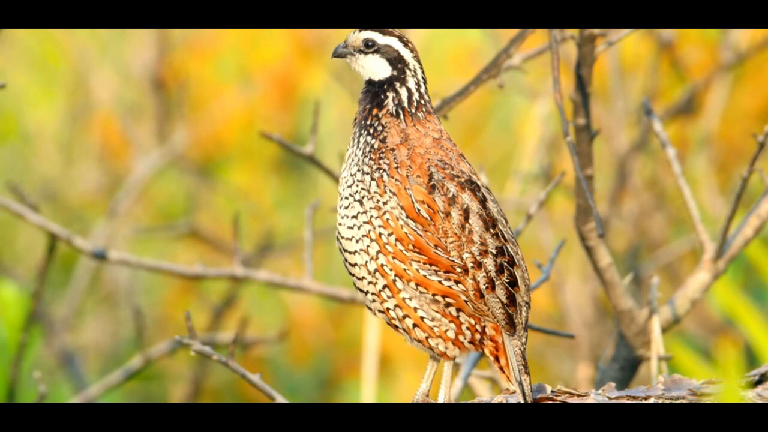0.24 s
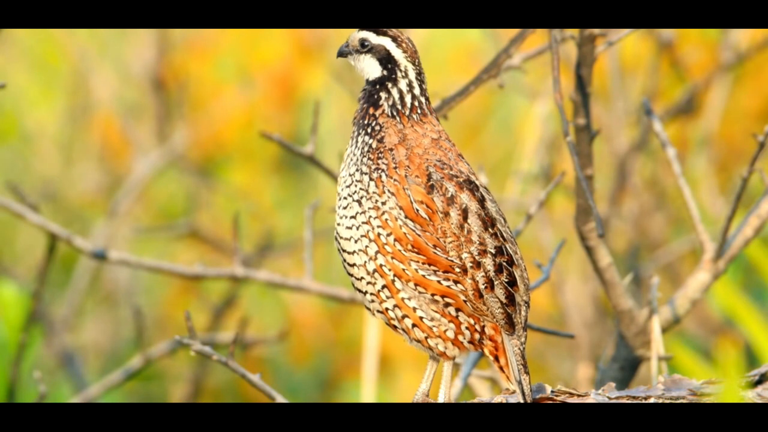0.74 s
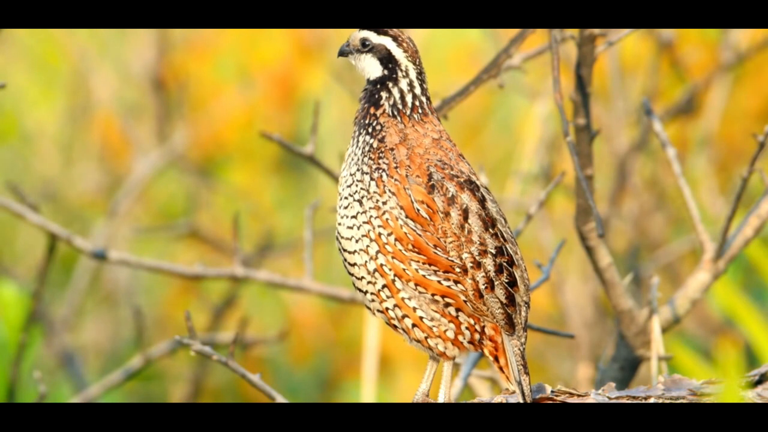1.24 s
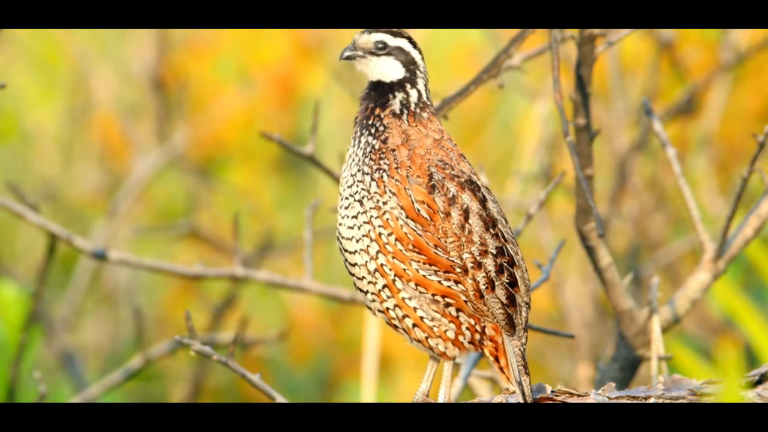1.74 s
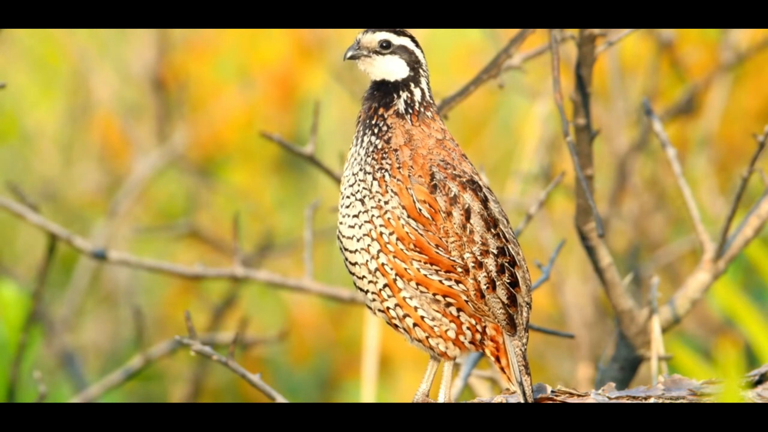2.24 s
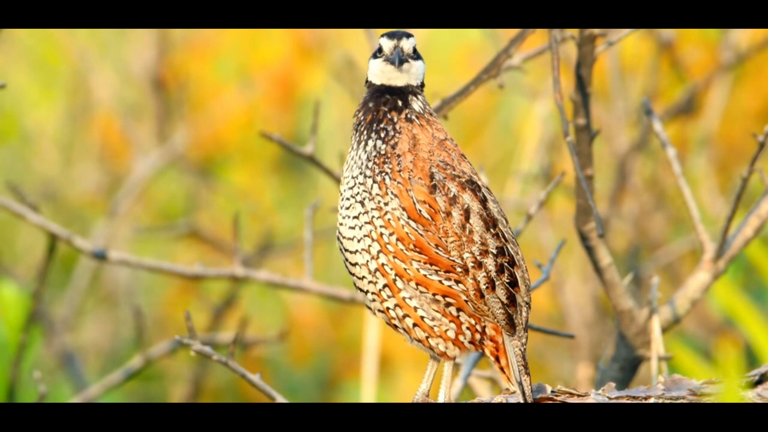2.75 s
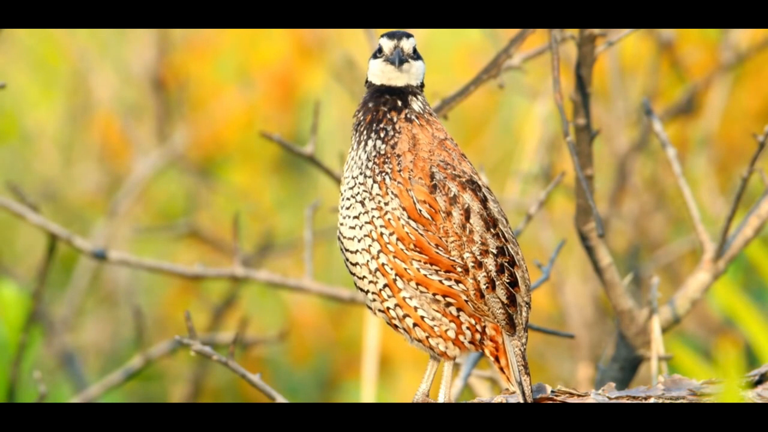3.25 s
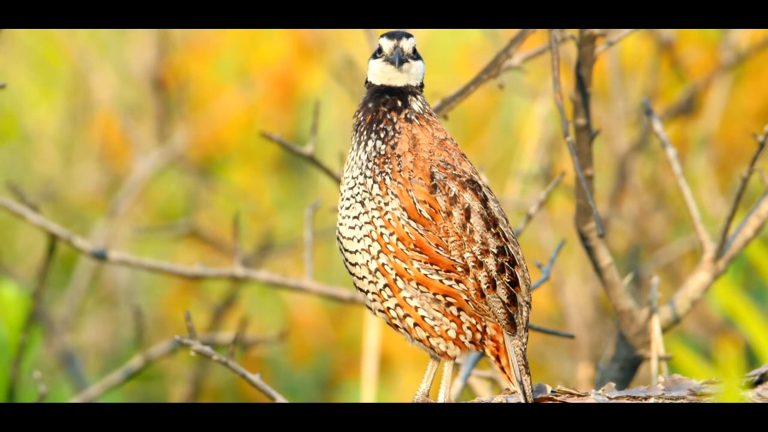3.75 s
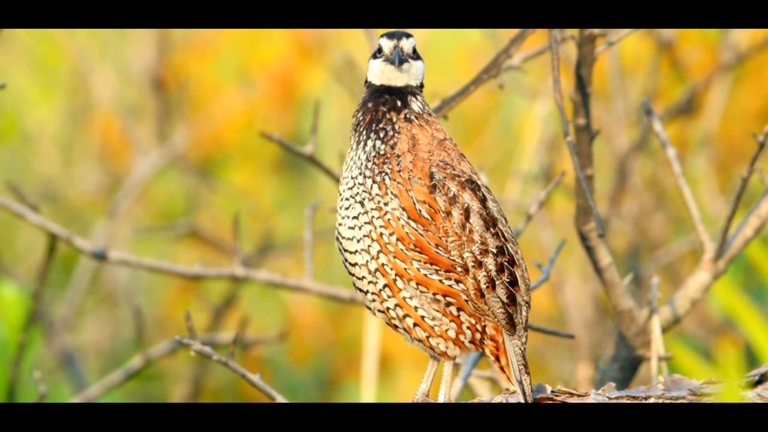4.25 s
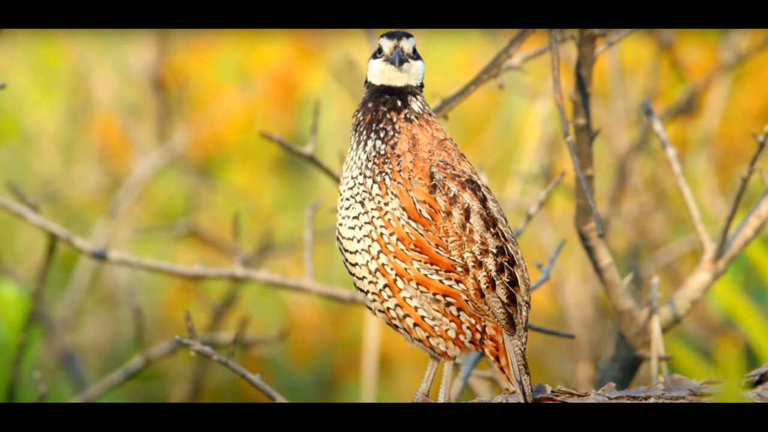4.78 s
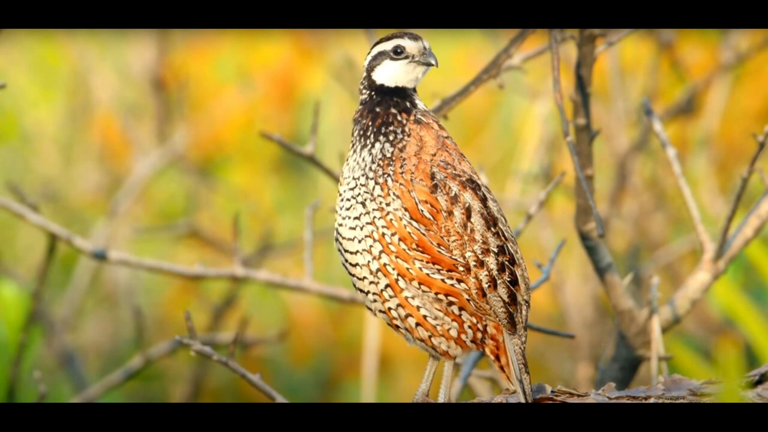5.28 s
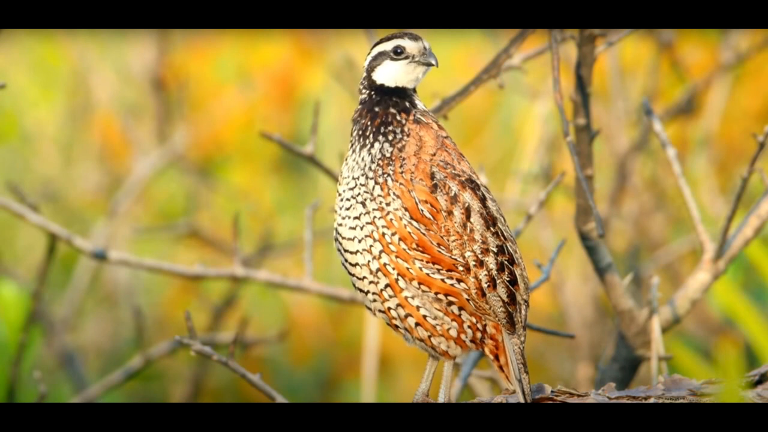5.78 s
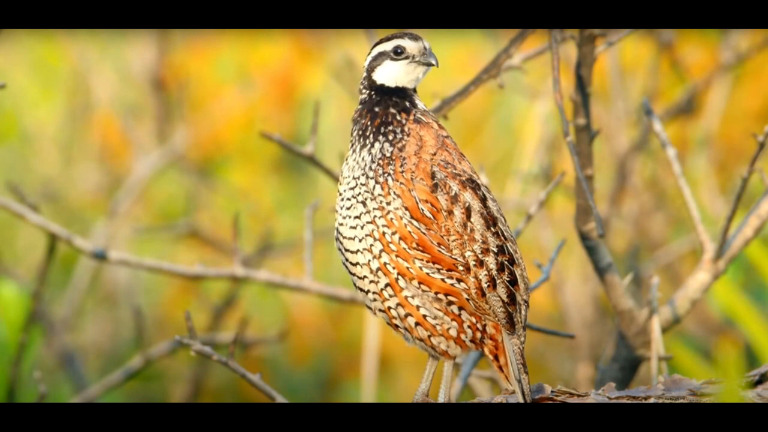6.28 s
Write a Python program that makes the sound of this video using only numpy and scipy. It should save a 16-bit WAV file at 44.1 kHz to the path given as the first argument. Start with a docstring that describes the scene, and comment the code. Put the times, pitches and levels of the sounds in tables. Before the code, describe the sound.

Outdoor scrub with pulsing crickets and small birds chirping and buzzing, while a nearby quail gives sweet, paired, bending whistles.

```python
"""Morning scrubland: close by, one bird whistles slurred pairs of nearly pure notes, made as bent tones.
A finch-like bird buzzes trills of fast sweeps, another repeats a three-part phrase, far birds chirp, chip,
toot and coo, and faint slurs blur behind them. Three crickets pulse steadily with short rests over bands of
farther ones; traffic rumble and hiss are shaped noise, and the bushes return a soft decaying tail."""
import sys
import numpy as np
from scipy import signal
from scipy.fft import rfft, irfft
from scipy.io import wavfile
from scipy.ndimage import uniform_filter1d

SR = 44100
rng = np.random.default_rng(int(sys.argv[2]) if len(sys.argv) > 2 else 0)


def master(y):
    """Save y as 16-bit WAV."""
    cut = np.clip(np.atleast_2d(y).T, -1, 1)
    pcm = np.round(cut * 32767)  # scale
    wavfile.write(sys.argv[1], SR, pcm.astype(np.int16))


N = 287532
T = np.arange(N) / SR


def undb(db):
    """Decibel law: 20 dB is a factor of ten in amplitude."""
    return 10 ** (np.asarray(db) / 20)


def level(x, db):
    """Normalisation: scales a signal to an rms level."""
    return x * undb(db) / np.sqrt(np.mean(x ** 2))


def band(hz, width_hz):
    """Spectral shaping: noise with a bell-shaped spectrum, rms 1."""
    f = np.arange(N // 2 + 1) * SR / N
    bell = np.exp(-((f - hz) / width_hz) ** 2)
    return level(irfft(rfft(rng.standard_normal(N)) * bell, N), 0)


def walk(rate):
    """Slow random modulation: values held 1 / rate s and slewed twice; spread near 1."""
    hold = int(SR / rate)
    steps = np.repeat(rng.standard_normal(N // hold + 1), hold)
    return 1.19 * uniform_filter1d(uniform_filter1d(steps, hold), hold)[:N]


def add(out, start_s, hz, gain, harmonics_db=()):
    """Additive synthesis: a tone with pitch and rms gain per sample, plus overtones from the 2nd up."""
    i = int(round(start_s * SR))
    phase = 2 * np.pi * (np.cumsum(hz) / SR + rng.random())
    tone = np.sin(phase) + sum(undb(db) * np.sin((k + 2) * phase) for k, db in enumerate(harmonics_db))
    tone = (np.sqrt(2) * gain * tone)[max(-i, 0):max(N - i, 0)]
    out[max(i, 0):max(i, 0) + len(tone)] += tone


def add_slur(out, start_s, length_s, hz3, db, sharp=1, harmonics_db=()):
    """Frequency glide: a short note bent through three pitches under a rounded swell."""
    u = np.arange(int(length_s * SR)) / (length_s * SR)
    first, middle, last = hz3
    # the parabola through the three pitches
    hz = first + (4 * middle - 3 * first - last) * u + 2 * (first + last - 2 * middle) * u ** 2
    add(out, start_s, hz, undb(db) * np.sin(np.pi * u) ** sharp, harmonics_db)


def sung(notes, edge_s, waver_hz, rate, overtone_db, break_hz=1):
    """Frequency modulation: notes follow pitch and level curves, with soft ends and unsteady pitch."""
    out, waver = np.zeros(N), waver_hz * walk(rate)
    for s, hz, db in (np.transpose(note) for note in notes):
        t = T[(T >= s[0] - edge_s) & (T < s[-1] + edge_s)]
        ends = np.clip(np.minimum(t - t[0], t[-1] - t) / edge_s, 0, 1)
        pitch = uniform_filter1d(np.interp(t, s, hz), size=130) + np.interp(t, T, waver)
        # where the voice breaks downward its octave falls into the throat resonance and rings out
        octave_db = np.where(pitch < break_hz, 0, overtone_db)
        add(out, t[0], pitch, ends * undb(np.interp(t, s, db)), [octave_db])
    return out


# falling notes: start_s, first_hz, bend_after_s, bend_hz, break_after_s, hz_before_break,
# level_at_bend_db, level_at_break_db
WHISTLE_FALLS = [(1.54, 3390, 0.056, 2800, 0.086, 2820, -29.5, -31),
                 (2.208, 3410, 0.039, 3190, 0.075, 3060, -31, -29),
                 (2.945, 3200, 0.0295, 3120, 0.079, 2860, -31, -27),
                 (3.581, 3390, 0.041, 3106, 0.082, 2870, -29.5, -29)]
# drop where the voice breaks: after_break_s, pitch_hz, level_re_break_db
VOICE_BREAK = [(.01, 2590, -3), (.014, 2340, -10), (.02, 1500, -18)]


def falling_notes():
    """Register break: the pitch bends down, then drops abruptly and fades."""
    notes = []
    onset_s, start_db, onset_db = .013, -12, -3.5  # levels relative to the bend
    for s, first, bend, bend_hz, knee, knee_hz, db, knee_db in WHISTLE_FALLS:
        note = [(s, first, db + start_db),
                (s + onset_s, first + (bend_hz - first) * onset_s / bend, db + onset_db),
                (s + bend, bend_hz, db),
                (s + knee, knee_hz, knee_db)]
        note += [(s + knee + after, hz, knee_db + less_db) for after, hz, less_db in VOICE_BREAK]
        notes.append(note)
    return notes


# dipping notes: start_s, shoulder_pause_s, jump_after_pause_hz, bottom_after_s, bottom_hz,
# back_at_shoulder_after_s, crest_before_top_hz, top_after_s, top_hz, closing_drop_hz, level_down_db, level_up_db
WHISTLE_DIPS = [(1.729, 0.0048, 3, 0.069, 2268, 0.11, 2720, .13, 2806, 420, -30, -28.5),
                (2.394, .018, 15, .084, 2180, .13, 2760, .147, 2980, 400, -32, -30.5),
                (3.134, 0.011, 200, .082, 2124, .133, 2720, 0.14, 2860, 250, -32, -29.5),
                (3.77, 0.0042, 0, 0.075, 2177, .114, 2700, 0.16, 2733, 100, -29.5, -27)]


def dipping_notes():
    """Continuous glide: down by way of a shoulder, loudest near its pitch and faint at the bottom, and up."""
    notes = []
    first_hz, shoulder_hz, drop_s = 3190, 2558, .031
    onset_s, onset_db, high_db = .008, -9, -2.5
    jump_s, jump_db_per_hz = .004, -.0355
    round_s, round_hz, low_db = .01353, 51, -9  # rounding of the bottom
    crest_share = .59  # where the rise bends between shoulder and top
    top_db, tail_s, tail_db = -8, .0145, -19
    for s, pause, jump_hz, low, low_hz, back, crest_hz, top, top_hz, drop_hz, db, up_db in WHISTLE_DIPS:
        go = s + drop_s + pause
        notes.append([(s, first_hz, db + onset_db),
                      (s + onset_s, first_hz, db + high_db),
                      (s + drop_s, shoulder_hz, db),
                      (go - jump_s, shoulder_hz, db),
                      (go, shoulder_hz + jump_hz, db + jump_db_per_hz * jump_hz),
                      (go + 2 * jump_s, shoulder_hz - 100, db),
                      (s + low - round_s, low_hz + round_hz, db + low_db / 2),
                      (s + low, low_hz, db + low_db),
                      (s + low + round_s, low_hz + round_hz, up_db + low_db),
                      (s + back, shoulder_hz, up_db),
                      (s + back + crest_share * (top - back), crest_hz, up_db - 1.0),
                      (s + top, top_hz, up_db + top_db),
                      (s + top + tail_s, top_hz - drop_hz, up_db + tail_db)])
    return notes


# quick downward flicks: start_s, drop_s, linger_s, first_hz, last_hz, level_db
WHISTLE_FLICKS = [(4.413, 0.019, 0.0073, 3550, 2890, -28), (4.533, 0.029, .004, 3400, 2840, -29.5),
                  (5.172, 0.0183, 0.018, 3650, 3040, -32), (5.307, 0.031, 0.011, 3450, 2870, -32.5),
                  (5.951, 0.028, 0.018, 3730, 2835, -25.5), (6.089, 0.024, 0.0033, 3450, 2820, -31.5)]
# course of a flick: share_of_drop, share_of_span, relative_level_db
FLICK_COURSE = [(0, 1, -13), (.25, 0.826, -6.5), (.5, 0.44, 0), (.75, .15, -2), (1, 0.028, -7)]


def flicked_notes():
    """Rapid downward sweep: the pitch levels out as it nears its last value."""
    notes = []
    for s, drop, linger, first, last, db in WHISTLE_FLICKS:
        note = [(s + u * drop, last + share * (first - last), db + less_db) for u, share, less_db in FLICK_COURSE]
        notes.append(note + [(s + drop + linger, last, db - 12)])
    return notes


# held notes: start_s, length_s, first_hz, settled_hz, step_after_s, hz_before_step, hz_after_step, last_hz,
# level_settled_db, level_at_step_db, level_at_end_db
WHISTLE_HOLDS = [(4.473, 0.051, 2830, 2710, .026, 2690, 2640, 2660, -33.5, -35, -38),
                 (4.593, 0.25, 2776, 2633, .1, 2596, 2534, 2414, -33, -32, -38.5),
                 (5.222, 0.069, 2690, 2680, .028, 2670, 2510, 2560, -32, -29.5, -35.5),
                 (5.362, 0.22, 2777, 2640, .115, 2578, 2490, 2402, -32.5, -29.5, -39.5),
                 (6.021, 0.06, 2620, 2560, .028, 2570, 2520, 2550, -27.5, -29.5, -37),
                 (6.143, 0.19, 2690, 2624, 0.056, 2600, 2500, 2264, -27.5, -30, -41.5)]


def held_notes():
    """Sustained tone: the pitch settles, steps down once and drifts to its last value."""
    notes = []
    attack_s, settle_s, release_s = .011, .0243, .0075
    edge_db, first_db, step_share = -12, -2, .1  # step_share is of the length
    for s, length, first, settled, step, upper, lower, last, db, step_db, end_db in WHISTLE_HOLDS:
        notes.append([(s, first, db + edge_db),
                      (s + attack_s, first, db + first_db),
                      (s + settle_s, settled, db),
                      (s + step, upper, step_db),
                      (s + step + step_share * length + .006, lower, step_db),
                      (s + length - release_s, last, end_db),
                      (s + length, last, end_db + edge_db)])
    return notes


def whistler():
    """Nearly sinusoidal whistle: a faint octave, as strong as the fundamental only below the voice break."""
    notes = falling_notes() + dipping_notes() + flicked_notes() + held_notes()
    return sung(notes, edge_s=.003, waver_hz=14, rate=60, overtone_db=-38, break_hz=2000)


# trills: first_pulse_s, last_pulse_s, pulses_per_s, slowing_per_s2, centre_hz, first_span_hz, last_span_hz,
# share_scattered_by_bushes_db, swell_s, level_at_start_db, level_after_swell_db, level_at_end_db
BUZZ_TRILLS = [(0.636, 1.397, 86, 17, 5940, 600, 1730, -16, .25, -56, -39.5, -41.5),
               (2.16, 2.695, 87, 24, 6100, 700, 1300, -3.5, .3, -56, -55, -55),
               (2.9335, 3.34, 103, 10.7, 5430, 340, 1160, -8.5, 0.26, -48.5, -33, -32),
               (3.7267, 4.626, 87, 15, 5920, 600, 1710, -19, 0.32, -71, -39.5, -41),
               (4.8525, 5.38, 93, 24, 6130, 640, 1250, -1.5, 0.34, -56, -54.5, -56)]


def trills():
    """Pulse train: falling sweeps, quick and faint at first, slow down and widen as the breath goes."""
    direct, scattered = np.zeros(N), np.zeros(N)
    for first, last, rate, slowing, hz, span0_hz, span1_hz, wet_db, swell, db0, db1, db2 in BUZZ_TRILLS:
        run = np.zeros(N)
        length = last - first
        k = np.arange(int(rate * length - slowing * length ** 2 / 2 + .5) + 1)
        # times at which the falling pulse rate has counted k pulses
        for s in first + (rate - np.sqrt(rate ** 2 - 2 * slowing * k)) / slowing:
            # full width is reached about half way through
            span = span0_hz + (span1_hz - span0_hz) * min(1, 1.94 * (s - first) / length)
            chance = rng.standard_normal(2)
            db = np.interp(s, (first + swell, last), (db1, db2)) + 1.1 * chance[0]
            db += (db0 - db1) * max(0, 1 - (s - first) / swell) ** 2
            sweep_hz = (hz + span * (.81 + .13 * chance[1]), hz, hz - .37 * span)
            add_slur(run, s - .0035, .0077, sweep_hz, db, sharp=1.67)
        direct, scattered = direct + run, scattered + undb(wet_db) * run
    # the ground returns each sweep 4.6 ms later, near half a pulse period
    return direct + undb(-14.5) * np.roll(direct, int(.0046 * SR)) + bushes(scattered)


# crickets: first_pulse_s, pulses_per_s, pulse_length_s, first_hz, last_hz, mean_level_db,
# second_harmonic_db, third_harmonic_db, level_scatter_db
CRICKET_PULSES = [(.003, 39.345, .015, 4350, 4080, -39.5, -25, -32, 0.76),
                  (0.000998, 40.93, .013, 4700, 4520, -46, -21, -30, 1.6),
                  (.0135, 53.4, 0.015, 5420, 5260, -54, -50, -51, 1.5)]
# rests, one list per cricket: from_s, to_s
CRICKET_RESTS = [
    [(1.0, 1.065), (3.77, 3.855), (5.71, 5.79)],
    [(.06, .12), (.3, .36), (.5, .57), (2.78, 2.86), (3.39, 3.45), (5.57, 5.64)],
    [(.39, .455), (1.91, 1.985), (2.31, 2.39), (3.62, 3.68), (4.84, 4.92), (5.23, 5.3)],
]


def crickets():
    """Stridulation: each wing stroke is a pulse that sags in pitch; strokes are regular, with short rests."""
    out = np.zeros(N)
    for pulses, rests in zip(CRICKET_PULSES, CRICKET_RESTS):
        first, rate, length, hz0, hz1, db, second_db, third_db, scatter_db = pulses
        for s in np.arange(first, N / SR, 1 / rate):
            chance = rng.standard_normal(2)
            if not any(a < s < b for a, b in rests):
                add_slur(out, s - length / 2 + .0004 * chance[0], length, (hz0, (hz0 + hz1) / 2, hz1),
                         db + scatter_db * chance[1], sharp=.68, harmonics_db=(second_db, third_db))
    return out


# repeated phrase: start_s, low_note_level_db
PHRASE_STARTS = [(3.401, -38), (3.556, -35), (3.705, -37), (3.853, -38), (4.003, -35.5), (4.153, -36.5),
                 (4.303, -37.5), (4.454, -40.5), (4.611, -37), (4.77, -40.5)]
# low note, slide and high note: after_start_s, length_s, first_hz, middle_hz, last_hz
PHRASE_NOTES = [(0, .024, 3600, 3550, 3440), (.026, .021, 3900, 4800, 5300), (.101, .024, 5650, 6190, 6230)]


def phrase_bird():
    """Discrete reflection: low note, rising slide, high note; a bank behind the bird returns one echo."""
    out = np.zeros(N)
    for k, (s, low_db) in enumerate(PHRASE_STARTS):
        parts_db = (low_db, -33.5, -39.5 - .37 * k)  # the high note weakens with each repeat
        # the last repeat stops before its high note
        parts = PHRASE_NOTES[:-1] if k == len(PHRASE_STARTS) - 1 else PHRASE_NOTES
        for (after, length, *hz3), db in zip(parts, parts_db):
            add_slur(out, s + after, length, hz3, db, sharp=.61)
    return out + undb(-14.5) * np.roll(out, int(.052 * SR))


# single chirps: start_s, length_s, first_hz, middle_hz, last_hz, top_level_db
SINGLE_CHIRPS = [(0.105, .076, 2730, 3400, 4000, -49), (0.347, .029, 3000, 3060, 3200, -49),
                 (1.49, 0.039, 2450, 2870, 3200, -41.5), (3.763, .026, 2605, 2750, 2670, -42),
                 (4.059, 0.029, 2800, 2930, 2730, -41), (4.354, 0.032, 2760, 2850, 2890, -42),
                 (4.926, 0.019, 2820, 2690, 2605, -39.5), (4.966, 0.062, 2796, 2675, 2630, -44.5),
                 (5.53, 0.047, 3000, 3130, 3200, -47), (5.732, 0.021, 2691, 2690, 2770, -43),
                 (5.832, 0.031, 3030, 3070, 3200, -42), (6.055, .025, 3200, 2950, 2750, -45),
                 (6.112, 0.035, 2960, 3050, 3200, -43), (6.321, .043, 3400, 3600, 3870, -46),
                 (6.412, 0.029, 3120, 3090, 2980, -40.5), (5.879, .09, 1700, 1740, 1750, -55.5),
                 (5.98, 0.031, 3600, 3800, 4000, -48), (6.475, .018, 2740, 2660, 2562, -39.5)]
# one bird see-saws between falling and rising chirps: start_s, length_s, level_db
FALLING_CHIRPS = [(.146, .02, -41.5), (.232, 0.023, -40), (.47, 0.028, -43), (.595, 0.015, -35),
                  (.945, .029, -40.5), (6.425, 0.037, -41.5)]
RISING_CHIRPS = [(.025, 0.017, -41), (.267, 0.024, -36.5), (.391, .017, -38), (.63, 0.027, -37),
                 (.748, 0.018, -36.5), (.987, 0.0285, -36.5), (1.361, 0.027, -38), (3.46, 0.019, -42.5)]
# thin, nearly level peeps: start_s, length_s, level_db
THIN_PEEPS = [(.09, .03, -47), (.443, 0.059, -45), (.802, .086, -47), (1.17, 0.051, -44),
              (5.862, 0.039, -48), (6.265, .047, -46)]
# long faint slides upward: start_s, length_s, level_db
RISING_SLIDES = [(.13, 0.17, -50), (2.44, .15, -54), (3.42, .15, -54), (4.704, 0.16, -49)]
# soft low toots: start_s, length_s, level_db
LOW_TOOTS = [(.695, 0.024, -54), (1.76, 0.056, -55), (2.11, 0.055, -56), (2.45, 0.05, -54),
             (2.82, .06, -57)]


def chirping_birds():
    """Amplitude fluctuation: far chirps flutter in level on the way through moving leaves."""
    out = np.zeros(N)
    for s, length, *hz3, db in SINGLE_CHIRPS:
        add_slur(out, s, length, hz3, db, sharp=.45)
    calls = ((FALLING_CHIRPS, (2980, 2660, 2490)),  # first, middle, last Hz
             (RISING_CHIRPS, (2560, 2680, 2920)),
             (THIN_PEEPS, (3460, 3390, 3400)),
             (RISING_SLIDES, (2960, 3330, 3850)),
             (LOW_TOOTS, (1500, 1510, 1460)))
    for rows, hz3 in calls:
        for s, length, db in rows:
            add_slur(out, s, length, hz3, db, sharp=.45)
    # a reedy arched note with overtones
    add_slur(out, 1.303, .045, (2680, 2920, 2500), -39, sharp=.42, harmonics_db=(-9, -20))
    return out * undb(2.6 * walk(90))


# harsh chips: top_s, level_db (before the weight of each partial)
HARSH_CHIPS = [(0.078, -36), (.14, -48), (0.399, -46), (.484, -37.5), (0.554, -38), (.626, -38.5),
               (.703, -39.5), (1.057, -34.5), (1.127, -33.5), (1.213, -31), (1.288, -32.5)]
# pitch course of a chip: from_top_s, pitch_hz
CHIP_COURSE = [(-.027, 1150), (-.016, 1700), (-.004, 2950), (0, 3120), (.004, 2950), (.012, 2400)]


def chipping_bird():
    """Source and resonance: rasping chips slide up, each partial swelling as it crosses the throat's."""
    out = np.zeros(N)
    throat_hz, width_hz = 3200, 490
    shape_s, shape_hz = np.transpose(CHIP_COURSE)
    t = np.arange(shape_s[0], shape_s[-1], 1 / SR)
    pitch = uniform_filter1d(np.interp(t, shape_s, shape_hz), size=150)
    for s, db in HARSH_CHIPS:
        # uneven cycles add lines half way between the harmonics
        for k, partial_db in ((1, -1.0), (1.5, -6.0), (2, -2.5)):  # (multiple, dB)
            throat = 1 / (1 + ((k * pitch - throat_hz) / width_hz) ** 2)
            throat = throat + undb(-17.5) * (k * pitch < throat_hz)
            gain = undb(db + partial_db) * throat * signal.windows.tukey(len(t), .4)
            add(out, s + t[0], k * pitch, gain)
    return out * (1 + .57 * walk(900))


# far coos: start_s, length_s, level_db (before the flutter)
FAR_COOS = [(-.13, .46, -52), (1.329, .42, -54.5), (2.55, .45, -51.5)]
# course of a coo: share_of_length, pitch_hz, relative_level_db
COO_COURSE = [(0, 615, -11.5), (.35, 655.5, 0), (.6, 700, -1.5), (1, 794, -12)]


def cooing_bird():
    """Propagation fading: low, breathy, rising coos whose level breaks up over the distance."""
    notes = [[(s + u * length, hz, db + less_db) for u, hz, less_db in COO_COURSE] for s, length, db in FAR_COOS]
    return sung(notes, edge_s=.033, waver_hz=16.8, rate=60, overtone_db=-29) * undb(3.5 * walk(25))


# course of far birdsong: time_s, low_band_level_db (near 1.7 kHz), high_band_reference_db (near 2.7 kHz)
FAR_SONG = [(0, -54, -56), (.8, -75, -57), (1.5, -54, -57), (2.2, -77, -59), (2.85, -61, -64),
            (3.15, -46, -58), (3.5, -56.5, -54), (3.95, -57, -44), (4.35, -45.5, -45), (4.7, -53, -42.5),
            (5.0, -57, -46.5), (5.3, -70, -47), (5.75, -70, -49), (6.1, -78, -48.5), (6.52, -76, -54)]


def babble(count, scatter_db):
    """Superposition: many faint short slurs from birds too far off to pick out."""
    out = np.zeros(N)
    s, _, db = np.transpose(FAR_SONG)
    draws = np.hstack([rng.random((count, 1)), rng.standard_normal((count, 5))])
    for when, pitch, bend, fall, long, loud in draws:
        start_s = when * N / SR
        hz = 2730 + 170 * pitch
        add_slur(out, start_s, .0196 * 1.26 ** long, (hz + 170 * fall, hz + 60 * bend, hz - 170 * fall),
                 np.interp(start_s, s, db) + scatter_db * loud)
    return out


def song_haze():
    """Modulated band noise: a haze of far song in two bands that flicker."""
    s, low_db, high_db = np.transpose(FAR_SONG)
    low = undb(np.interp(T, s, low_db) + 2.1 * walk(12)) * band(1760, 720)
    high = undb(np.interp(T, s, high_db) - 3.5 + 2.0 * walk(25.09)) * band(2680, 510)
    return low + high


# farther crickets: centre_hz, width_hz, level_db
FAR_CRICKETS = [(4244, 170, -51.5), (4630, 360, -48.5), (5120, 110, -63.5)]


def cricket_chorus():
    """Incoherent sum: farther crickets blurred into wavering bands of noise."""
    return sum(undb(db + 1.14 * walk(40)) * band(hz, width) for hz, width, db in FAR_CRICKETS)


# swell of far traffic near 900 Hz: time_s, level_db
TRAFFIC_SWELL = [(0, -69), (1.4, -54.5), (2.4, -59), (3.5, -60.5), (6.52, -65)]


def traffic_drone():
    """Modulated band noise: far traffic swells and wavers."""
    return undb(np.interp(T, *np.transpose(TRAFFIC_SWELL)) + 2.0 * walk(4.96)) * band(911, 180)


# spectrum of traffic rumble and hiss: frequency_hz, relative_density_db
RUMBLE_AND_HISS = [(12, -21), (20, 4.5), (109, -6), (369, -26.5), (848, -15), (1120, -21), (2060, -16.5),
                   (2650, -16), (3590, -23), (4240, -11), (5750, -29.5), (7390, -38.5), (8490, -36),
                   (12900, -40.5), (15200, -42.5)]


def rumble_and_hiss():
    """Spectral shaping: steady noise under a spectral curve, -43.5 dB rms in all."""
    f = np.maximum(np.arange(N // 2 + 1) * SR / N, 1)
    hz, db = np.transpose(RUMBLE_AND_HISS)
    shape = undb(np.interp(np.log(f), np.log(hz), db))
    return level(irfft(rfft(rng.standard_normal(N)) * shape, N), -43.5)


def bushes(x):
    """Diffuse reverberation: convolution with decaying noise of unit energy."""
    t60_s, rise_s = .66, .0051
    t = np.arange(int(.6 * SR)) / SR
    tail = rng.standard_normal(len(t)) * np.exp(-np.log(1000) * t / t60_s) * np.clip(t / rise_s, 0, 1)
    return signal.fftconvolve(x, tail / np.sqrt(np.sum(tail ** 2)))[:N]


def scene():
    """Superposition: near and far sources, the bushes' answer and the background add up."""
    near = whistler() + crickets()
    far = phrase_bird() + chirping_birds() + chipping_bird() + cooing_bird() + babble(count=300, scatter_db=1.5)
    echo = bushes(undb(-14) * near + undb(-6.5) * far)
    background = song_haze() + cricket_chorus() + traffic_drone() + rumble_and_hiss()
    return (near + trills() + far + echo + background)[None]


def record(dry):
    """Low-pass filtering: a steep elliptic filter removes what lies above 15.15 kHz."""
    return signal.sosfilt(signal.ellip(10, .2, 60, 15150, fs=SR, output="sos"), dry)


dry = scene()
out = record(dry)
master(out)
```